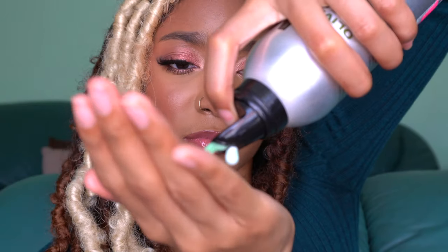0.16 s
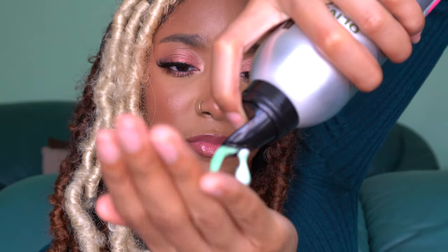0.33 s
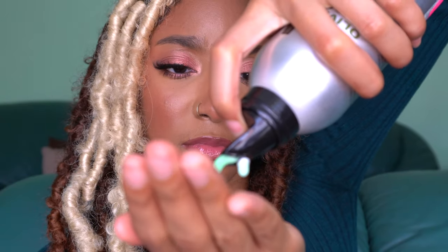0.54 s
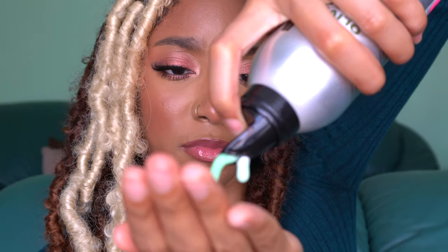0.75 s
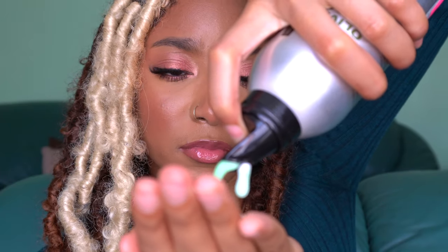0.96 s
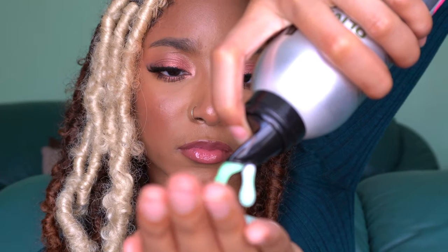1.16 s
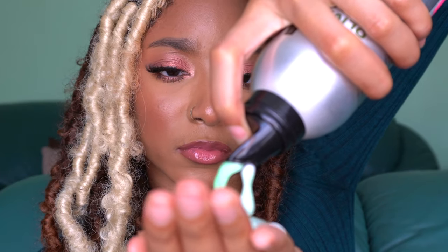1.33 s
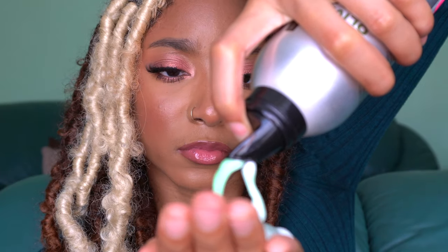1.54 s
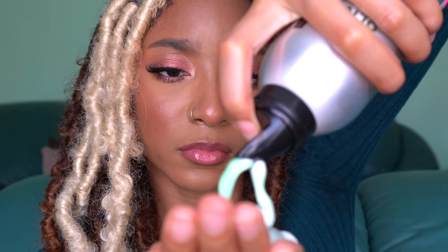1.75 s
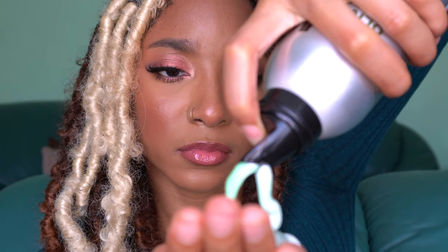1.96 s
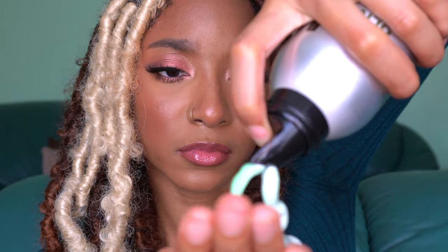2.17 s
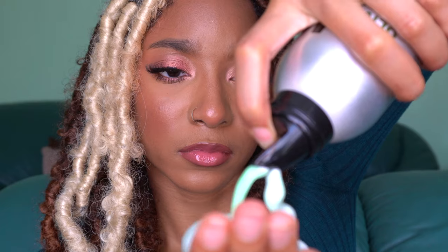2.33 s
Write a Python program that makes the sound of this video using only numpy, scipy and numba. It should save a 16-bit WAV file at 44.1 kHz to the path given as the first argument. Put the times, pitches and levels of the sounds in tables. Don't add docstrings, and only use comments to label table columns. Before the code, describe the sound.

A can of hair mousse is emptied close to a stereo microphone in a small soft room: a quiet fizzy hiss with an early pop, then abruptly a louder wet sputter of bursting bubbles over faint low rumble.

```python
import sys
import numpy as np
from scipy import signal
from scipy.fft import rfft, irfft
from scipy.io import wavfile
from scipy.ndimage import uniform_filter1d
from numba import njit

SR = 44100
rng = np.random.default_rng(int(sys.argv[2]) if len(sys.argv) > 2 else 0)


def put_to_file(sound):
    columns = np.atleast_2d(sound).T
    safe = np.clip(columns, -1, 1)
    whole_steps = np.round(safe * 32767)
    wavfile.write(sys.argv[1], SR, whole_steps.astype(np.int16))


def voltage_ratio(decibels):
    exponent = np.asarray(decibels, float) / 20
    return 10 ** exponent


N = 110205


def col(table, k, x, log=False):
    a = np.array(table, float)
    if log:
        return np.interp(np.log(x), np.log(a[:, 0]), a[:, k])
    return np.interp(x, a[:, 0], a[:, k])


def unit(x):
    return x / np.sqrt(np.mean(x ** 2))


@njit
def ring(x, g, k):
    y, band, low = np.empty(len(x)), 0., 0.
    for i in range(len(x)):
        v = (band + g[i] * (x[i] - low)) / (1 + g[i] * (g[i] + k[i]))
        band, low = 2 * v - band, low + 2 * g[i] * v
        y[i] = k[i] * v
    return y


def resonate(x, hz, width_hz, order=1):
    hz = np.full(N, hz, float)
    for _ in range(order):
        x = ring(x, np.tan(np.pi * hz / SR), width_hz / hz)
    return x


def walk(rate_hz):
    hold = max(int(SR / rate_hz), 2)
    levels = np.repeat(rng.standard_normal(N // hold + 1), hold)
    return unit(uniform_filter1d(uniform_filter1d(levels, hold), hold)[:N])


def grains(per_s, spread_db):
    chance, sign, size = rng.random((3, N))
    height = voltage_ratio(spread_db * np.minimum(-np.log(1 - size), 3))
    return unit((chance < per_s / SR) * np.sign(sign - .5) * height)


def decay(t, start_s, t60_s):
    return voltage_ratio(-60 * np.maximum(t - start_s, 0) / t60_s) * (t >= start_s)


def bubbles(t, rows, rise_s, glide):
    out = np.zeros(N)
    for (peak_s, db, hz), turn in zip(rows, rng.random(len(rows))):
        i = max(int((peak_s - rise_s) * SR), 0)
        u = t[:min(N - i, int(12 * rise_s * SR))] / rise_s
        swell = (u * np.exp(1 - u)) ** 2
        cycles = turn + hz * rise_s * u * (1 + glide * u)
        out[i:i + len(u)] += voltage_ratio(db) * swell * np.sin(2 * np.pi * cycles)
    return out


# (frequency [Hz], level [dB])
BALANCE = [(1000, -2.5), (2500, -4.5), (4500, -1), (8000, -1.5), (13000, -6)]
# (frequency [Hz], level [dB])
WIDTH = [(1000, -30), (3500, -18.5), (8000, -13.5), (14000, -16)]


def ports(drive, other, hz, width_hz, wide_db=0):
    centre = np.clip(hz * (1 + .007 * walk(5.37)), 20, .45 * SR)
    mid = resonate(drive, centre, 1.43 * width_hz, order=2)
    side = resonate(other, centre, 1.43 * width_hz, order=2)
    f = np.mean(hz)
    side = side * voltage_ratio(col(WIDTH, 1, f, True) + wide_db)
    balance_db = col(BALANCE, 1, f, True) * np.array([[.5], [-.5]])
    return np.array([mid + side, mid - side]) * voltage_ratio(balance_db)


def tube(rows, loss_db, throb, per_s, spread_db, grain_db, band_db, band_per_s, wide_db):
    fizz = [voltage_ratio(grain_db) * grains(per_s, spread_db) for _ in range(2)]
    bands = []
    for hz, width_hz, db, _ in rows:
        level = voltage_ratio(db + band_db * walk(band_per_s))
        drive, other = (throb * (rng.standard_normal(N) + g) for g in fizz)
        bands.append(level * ports(drive, other, hz, width_hz, wide_db))
    open_rms = np.sqrt(np.mean(sum(bands) ** 2))
    return sum(b * voltage_ratio(-loss) for b, loss in zip(bands, loss_db)) / open_rms


# (time [s], level [dB], foam load in the nozzle [0-1])
JET_FLOW = [(0, -39, 0), (.2, -38, 0.09), (.95, -36.5, 0.27), (1.05, -37.5, 0.22), (1.26, -36, 0.51),
            (1.42, -37, 0.51), (1.5, -34, 0.42), (1.55, -38.5, 0.43), (1.59, -37.5, 0.75),
            (1.65, -37, 0.74), (1.7, -40.5, 1.1), (1.74, -48, 1), (1.9, -65, 1)]
# (frequency [Hz], width [Hz], level [dB], loss under full foam [dB])
NOZZLE_MODES = [(1362, 69, -16.5, 5.5), (2070, 340, -4, 22), (3067, 120, -6.5, 0), (3770, 700, -1, 16.5),
                (4297, 430, -2.5, -3), (4920, 1080, -8, 3), (6580, 250, 0, 6.5), (7300, 880, -5, 19),
                (8040, 2000, -2.5, 7.5), (8800, 1400, -3.5, 14.5), (10980, 1150, -0.5, 9),
                (11900, 3600, -7.5, 25), (13230, 1500, -6, 18), (14900, 1900, -10, 23)]


def jet(t):
    foam = col(JET_FLOW, 2, t)
    loss_db = [r[3] * foam for r in NOZZLE_MODES]
    flicker = voltage_ratio(0.7 * walk(40.3))
    hiss = tube(NOZZLE_MODES, loss_db, flicker, per_s=1800, spread_db=3.6, grain_db=-4.5,
                band_db=1.7, band_per_s=45, wide_db=5)
    return 2.3 * voltage_ratio(col(JET_FLOW, 1, t)) * hiss


# (time [s], level [dB])
RUMBLE_LEVEL = [(0, -44.5), (.07, -43.5), (.3, -44), (.45, -46), (.55, -42), (.7, -49), (.82, -42.5),
                (1.02, -48), (1.21, -43.5), (1.32, -48), (1.48, -45.5), (1.7, -49), (1.98, -47.5),
                (2.04, -51.5), (2.1, -47), (2.26, -44.5), (2.38, -51.5), (2.45, -48.5)]
# (frequency [Hz], width [Hz], level [dB])
ROOM_MODES = [(57, 37, -18), (88, 17, -8.5), (123.5, 56, -8), (160, 12.7, -3.5), (218.2, 8.6, -3.5),
              (234, 20, -10), (294.3, 24, -6.5), (387, 87, -14.5), (523, 75, -20)]


def rumble(t):
    out, gust_db = 0, 1.4 * walk(20)
    for hz, width_hz, db in ROOM_MODES:
        mid = unit(resonate(rng.standard_normal(N), hz, width_hz))
        side = unit(resonate(rng.standard_normal(N), hz, width_hz))
        level = voltage_ratio(db + gust_db + 2.03 * walk(11.7)) * np.sqrt(width_hz / 30)
        out = out + level * (mid + hz / 1100 * side * np.array([[1], [-1]]))
    return unit(out) * voltage_ratio(col(RUMBLE_LEVEL, 1, t) - 1.0)


# (frequency [Hz], width [Hz], level [dB])
AIR_BANDS = [(595, 200, -3), (1300, 670, -14.5), (2560, 3300, -5), (12200, 10000, 2)]


def still_air():
    air = 0
    for hz, width_hz, db in AIR_BANDS:
        both = [resonate(rng.standard_normal(N), hz, width_hz) for _ in range(2)]
        air = air + voltage_ratio(db) * np.array(both)
    return unit(air) * voltage_ratio(-52.5)


# (peak time [s], peak level [dB], frequency [Hz], length [s])
DEEP_SWELLS = [(0.146, -44, 55.6, 0.083), (0.46, -39.5, 89.6, 0.076), (1.113, -46, 88, 0.1),
               (1.208, -47, 52, 0.13), (1.455, -43.5, 87.2, 0.18), (1.68, -44, 88, 0.14),
               (1.827, -39, 88, 0.024), (1.93, -49.5, 52.3, 0.19), (2.095, -40, 88, 0.035),
               (2.194, -37, 88, 0.1), (2.408, -46, 91.1, 0.54)]


def swells(t):
    deep = 0
    for peak_s, db, hz, length_s in DEEP_SWELLS:
        envelope = voltage_ratio(db) * np.exp(-(2 * (t - peak_s) / length_s) ** 2)
        deep = deep + envelope * np.sin(2 * np.pi * (hz * t + 0.22 * walk(25.09)))
    return voltage_ratio(2.0 * walk(29.95)) * deep


# (peak time [s], peak level [dB], frequency [Hz])
HOUSE_THUDS = [(0.0841, -34.5, 269), (0.13, -37, 269), (0.158, -35.5, 260), (0.1843, -44, 280),
               (0.261, -40.0, 276), (0.3165, -33.5, 295), (0.3878, -41, 320), (0.446, -40.5, 260),
               (0.5344, -32.5, 282), (0.5789, -34, 290), (0.6062, -43, 280), (0.8136, -40.0, 269),
               (0.8495, -43, 270), (0.8991, -38.5, 286), (1.2216, -38.5, 240), (1.4323, -43, 247),
               (1.491, -36, 256), (1.5532, -36, 310), (1.635, -39, 210), (1.9533, -41.5, 228),
               (2.0898, -41, 268), (2.122, -43, 288), (2.1713, -42, 262), (2.2222, -36, 255),
               (2.253, -36.5, 245), (2.437, -39, 268)]


def thuds(t):
    return voltage_ratio(-1.5) * bubbles(t, HOUSE_THUDS, rise_s=.00601, glide=0)


# (peak time [s], peak level [dB], frequency [Hz])
BUBBLE_POPS = [(0.0921, -18.5, 1750), (.0935, -29, 770), (0.0953, -29, 1330), (.107, -39, 1370),
               (.1176, -37, 1490), (.747, -36, 1410), (1.040, -41, 930), (1.823, -29, 1670),
               (1.8373, -24, 1620), (1.849, -37, 1670), (2.0015, -28.5, 1040), (2.048, -34, 1470),
               (2.3175, -29, 1520), (2.4492, -28.5, 1800)]


def pops(t):
    envelope = 0
    for s, db, _ in BUBBLE_POPS:
        crack = voltage_ratio(db - 20) * decay(t, s, t60_s=.012)
        tail = voltage_ratio(db - 21) * decay(t, s, t60_s=.22)
        envelope = envelope + crack + tail
    drive, other = envelope * rng.standard_normal((2, N))
    rupture = 3 * ports(drive, other, hz=1700., width_hz=1100.)
    rings = bubbles(t, BUBBLE_POPS, rise_s=.00045, glide=.017)
    return rupture + rings * voltage_ratio(np.array([[-1.2], [1.2]]))


# (time [s], level [dB], centre of the foam mouth [Hz], muffling [dB])
SPUTTER_FLOW = [
    (1.716, -34, 3050, -2.5),
    (1.76, -34, 3100, -3),
    (1.86, -31, 3250, 3),
    (1.906, -35, 3230, 0),
    (1.99, -31, 3220, 3.5),
    (2.1, -33, 3320, 1),
    (2.22, -34, 3370, 9.5),
    (2.31, -31, 3480, 12.5),
    (2.5, -34, 3600, 9.5),
]
# (frequency [Hz], width [Hz], level [dB], share of the muffling [ratio])
FOAM_MODES = [(940, 320, -16.5, 0.58), (1330, 113, -11.5, 0.36), (2070, 210, 0, 0.27),
              (2395, 300, -3, 0.36), (3010, 180, -6.5, 0.46), (4250, 450, -2, 0.18), (4730, 540, -3, 0.9),
              (5400, 240, -5, 1.8), (6430, 290, -6.5, 1.45), (7050, 230, -7, 0.56),
              (7730, 350, -10.5, 0.15), (11660, 730, -21.5, 0.91), (14400, 1500, -24.5, 0.68)]


def sputter(t):
    mouth = (col(SPUTTER_FLOW, 2, t), 685, 0, 0)
    rows = list(FOAM_MODES) + [mouth]
    muffling_db = col(SPUTTER_FLOW, 3, t)
    loss_db = [muffling_db * r[3] for r in rows]
    surge = 1 + .25 * sum(np.exp(-((t - r[0]) / .004) ** 2) for r in LARGE_BURSTS)
    glug = voltage_ratio(1.1 * walk(300))
    flow = tube(rows, loss_db, surge * glug, per_s=1100, spread_db=3, grain_db=1.5,
                band_db=2.3, band_per_s=160, wide_db=-14)
    onset_db = 600 * np.minimum(t - SPUTTER_FLOW[0][0], 0)
    return flow * voltage_ratio(col(SPUTTER_FLOW, 1, t) + onset_db)


# (peak time [s], peak level [dB], frequency [Hz])
LARGE_BURSTS = [(1.731, -30, 3740), (1.7475, -25.5, 3890), (1.7545, -25.5, 3420), (1.7609, -28, 3380),
                (1.7661, -22, 3170), (1.7799, -23, 3390), (1.7882, -16.5, 3500), (1.7922, -23, 3590),
                (1.8282, -25.5, 3210), (1.8393, -20, 3280), (1.8448, -23.5, 3280), (1.8524, -25.5, 3750),
                (1.8614, -26, 3420), (1.8664, -17, 3350), (1.8795, -23.5, 3440), (1.8874, -23, 3450),
                (1.9364, -20, 3300), (1.945, -25.0, 3320), (1.958, -24.0, 3610), (1.9719, -24, 3530),
                (1.9776, -24, 3340), (1.9855, -22.5, 3180), (1.9928, -28, 3230), (2.0006, -22, 3780),
                (2.007, -29, 3430), (2.0132, -27, 3510), (2.0244, -26, 3380), (2.0319, -28, 3330),
                (2.0498, -16, 3620), (2.0543, -25, 3400), (2.0624, -24, 3400), (2.0841, -23.0, 3730),
                (2.102, -21, 3330), (2.1189, -27, 3340), (2.155, -18, 3510), (2.1683, -20, 3330),
                (2.1739, -16, 3320), (2.1779, -18, 3370), (2.2224, -23, 3710), (2.2489, -26, 3660),
                (2.261, -24.0, 3600), (2.2884, -25.5, 3320), (2.2991, -23, 3750), (2.3147, -23.0, 3680),
                (2.3273, -15.5, 3820), (2.3396, -30, 3750), (2.3515, -25.0, 3900), (2.3666, -20, 4200),
                (2.3841, -28, 3550), (2.3897, -26, 3600), (2.3982, -20, 3830), (2.4057, -17.5, 3340),
                (2.4242, -22, 4000), (2.4317, -20, 3590), (2.4462, -22, 3440), (2.4507, -25, 3610),
                (2.4556, -23.5, 3330), (2.4606, -20, 3490), (2.4733, -17.5, 3470), (2.491, -22, 3750)]


def bursts(t):
    rings = voltage_ratio(-1.5) * bubbles(t, LARGE_BURSTS, rise_s=.0006, glide=.0044)
    return rings * voltage_ratio(np.array([[-1.2], [1.2]]))


# (time [s], peak level [dB], T60 [s], lower band level [dB])
GAS_SPITS = [
    (1.7525, -36, .015, 3),
    (1.76, -25, 0.015, 4),
    (1.775, -40, .02, -3),
    (1.8113, -32.5, 0.015, 10.5),
    (1.8398, -38, 0.015, 1),
    (1.903, -43, 0.04, -4),
    (2.003, -25.5, 0.031, 1.5),
    (2.0125, -44, 0.055, -2),
    (2.0834, -31.5, 0.03, -7),
    (2.3135, -38.5, 0.03, 9.5),
]
# (frequency [Hz], width [Hz], level [dB], upper bands only)
SPIT_BANDS = [(6900, 2200), (12200, 1100, -2), (14300, 1800, 4.9)]


def spits(t):
    envelopes = [voltage_ratio(db) * decay(t, s, t60_s) for s, db, t60_s, _ in GAS_SPITS]
    low = sum(e * voltage_ratio(r[3]) for e, r in zip(envelopes, GAS_SPITS))
    high = sum(envelopes)
    drive, other = rng.standard_normal((2, N))
    out = ports(low * drive, low * other, *SPIT_BANDS[0])
    for hz, width_hz, db in SPIT_BANDS[1:]:
        out = out + voltage_ratio(db) * ports(high * drive, high * other, hz, width_hz)
    return 1.47 * out


def room(x):
    t60_s, level_db, gap_s = 0.22, -9, 0.0022
    u = np.arange(SR // 4) / SR
    tail = rng.standard_normal((2, len(u))) * voltage_ratio(-60 * u / t60_s) * np.clip(u / gap_s - 1, 0, 1)
    tail = signal.lfilter([.6], [1, -.4], tail)
    tail = tail / np.sqrt(np.sum(tail ** 2, axis=1, keepdims=True))
    return x + voltage_ratio(level_db) * signal.fftconvolve(x, tail, axes=1)[:, :N]


def scene():
    t = np.arange(N) / SR
    can = jet(t) + pops(t) + sputter(t) + bursts(t) + spits(t)
    house = rumble(t) + swells(t) + thuds(t)
    pan = voltage_ratio(-1.5 * np.array([[.5], [-.5]]))
    return room(can) + house * pan + still_air()


# (frequency [Hz], phase [rad])
LEFT_PHASE = [(100, 0), (6000, .05), (8000, .7), (15000, .9)]


def housing(dry):
    hz = np.arange(N // 2 + 1) * SR / N + 1
    left = irfft(rfft(dry[0]) * np.exp(-1j * col(LEFT_PHASE, 1, hz, True)), N)
    return np.array([v - .78 * resonate(v, 9600, 800) for v in (left, dry[1])])


def top_cut(x):
    return signal.sosfilt(signal.butter(12, 15880, fs=SR, output="sos"), x)


def record(dry):
    low_pass = signal.ellip(6, .2, 60, 16200, fs=SR, output="sos")
    mix = signal.sosfilt(low_pass, housing(dry))
    return top_cut(mix)


dry = scene()
out = record(dry)
put_to_file(out)
```